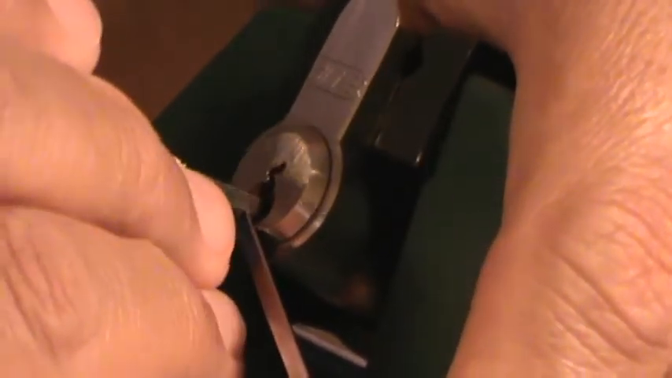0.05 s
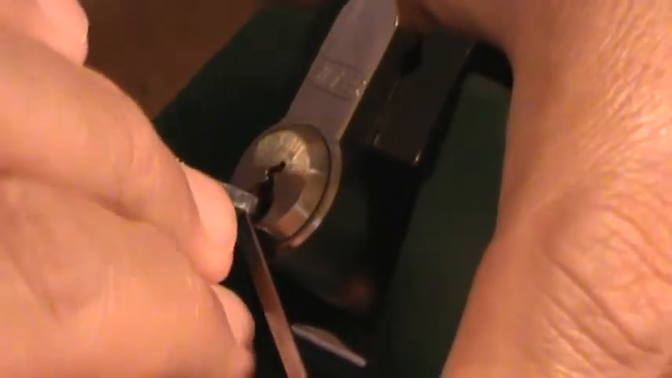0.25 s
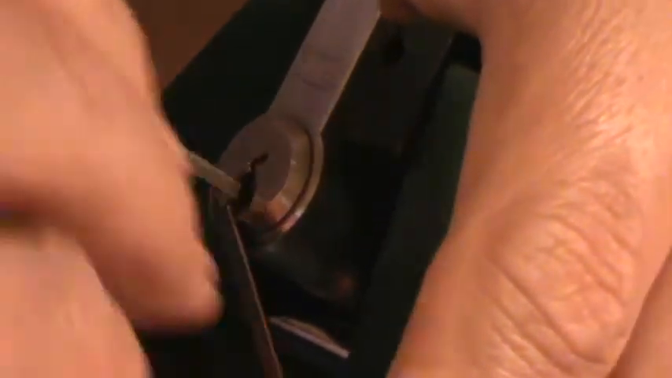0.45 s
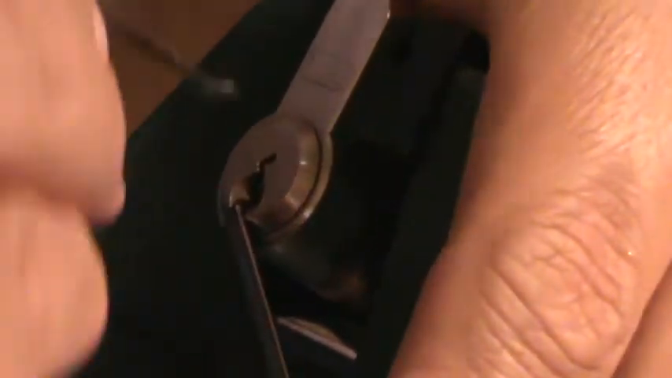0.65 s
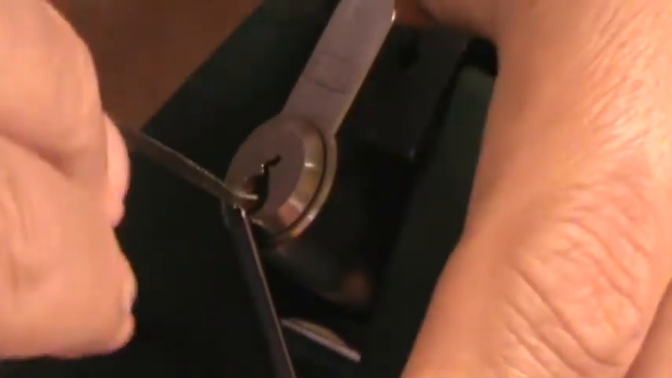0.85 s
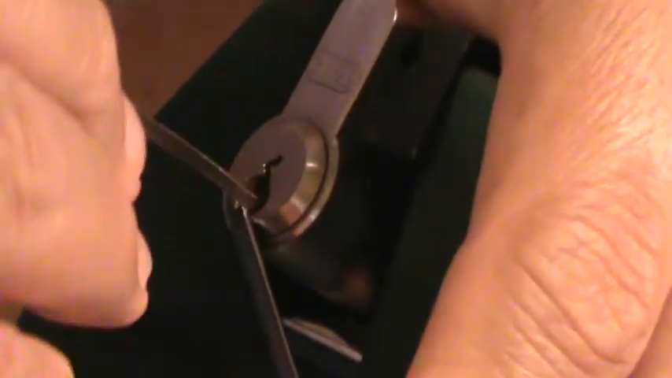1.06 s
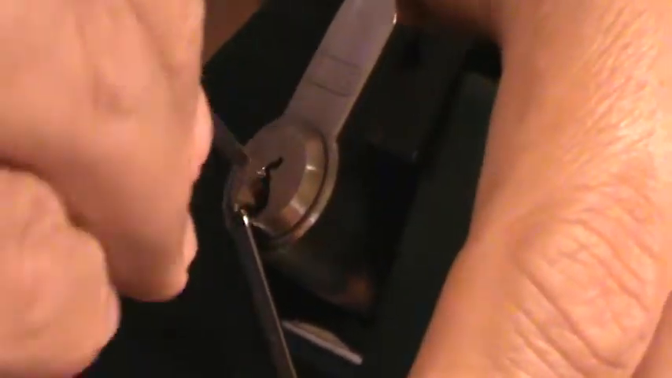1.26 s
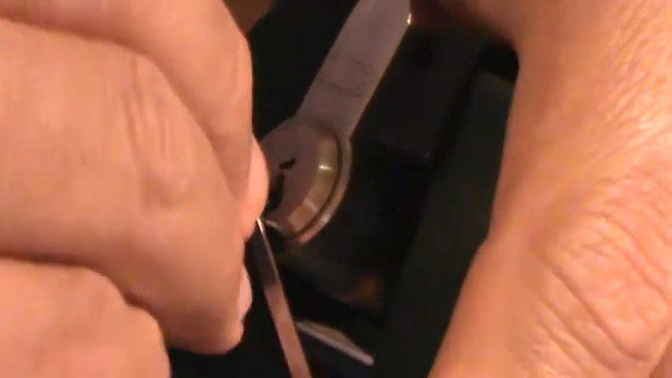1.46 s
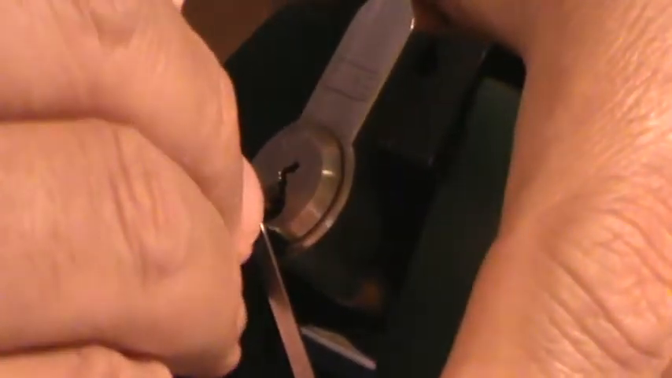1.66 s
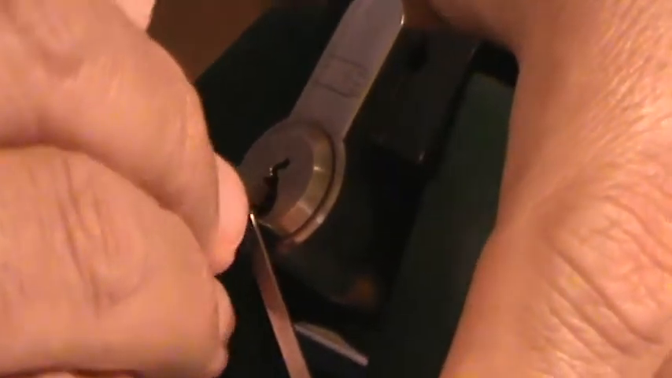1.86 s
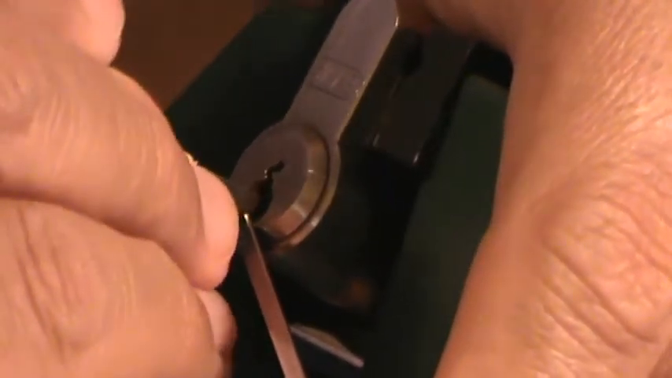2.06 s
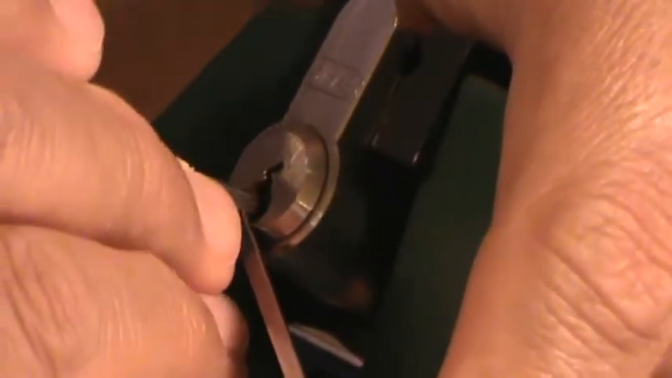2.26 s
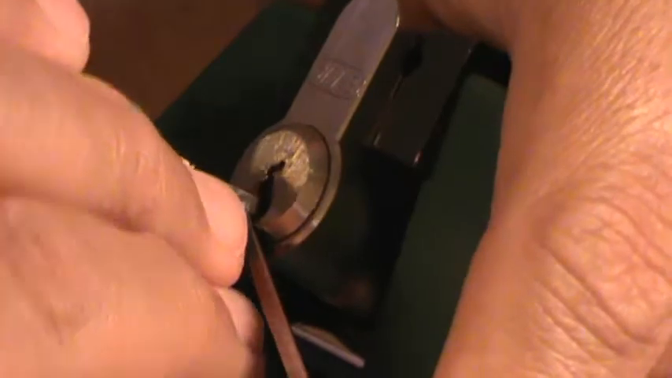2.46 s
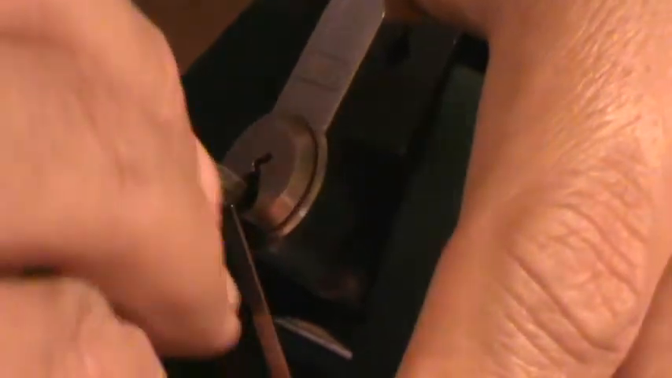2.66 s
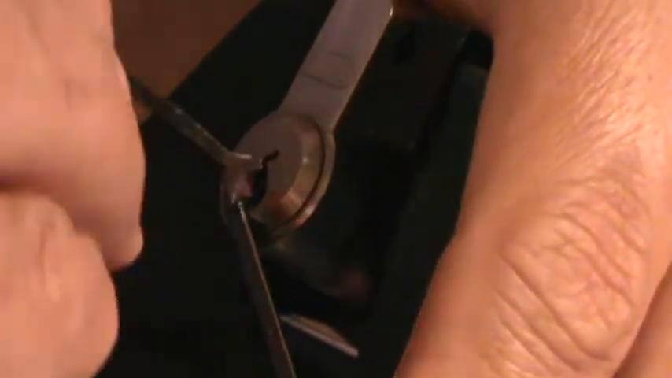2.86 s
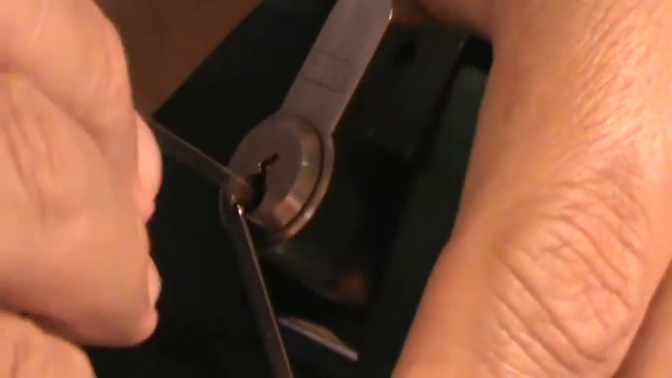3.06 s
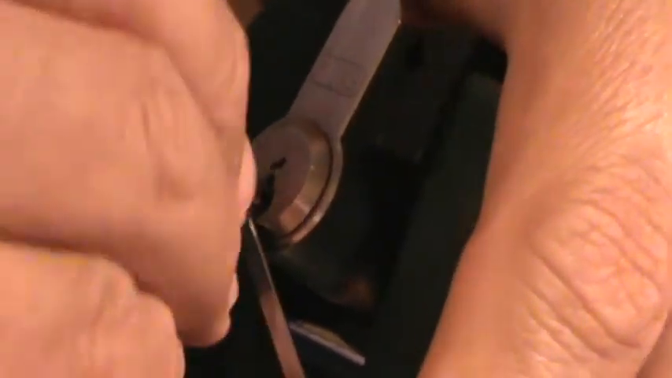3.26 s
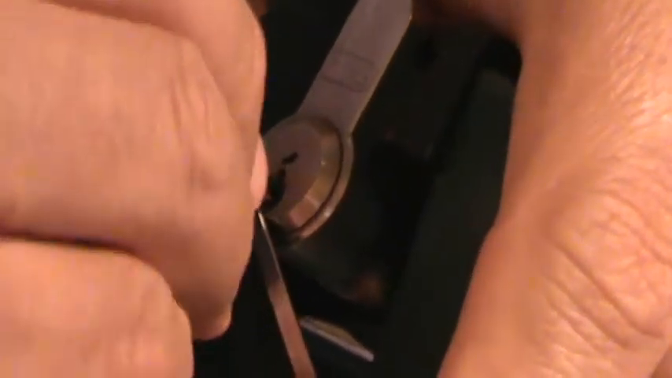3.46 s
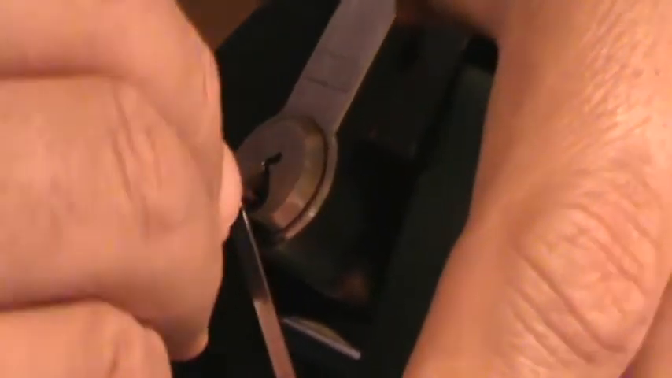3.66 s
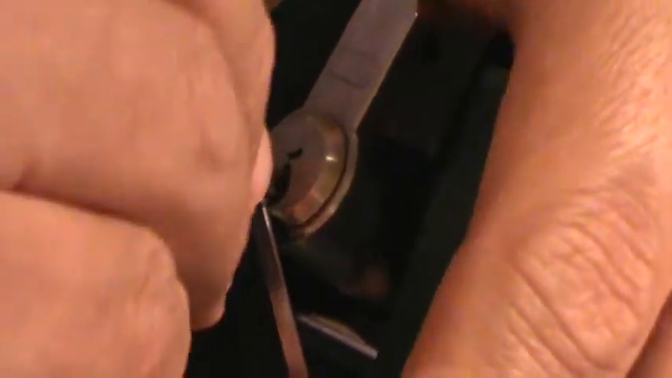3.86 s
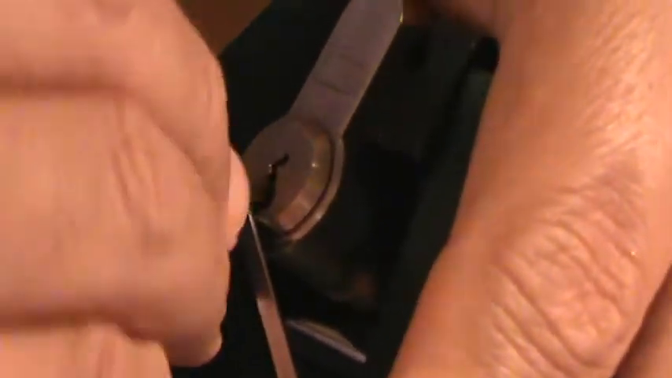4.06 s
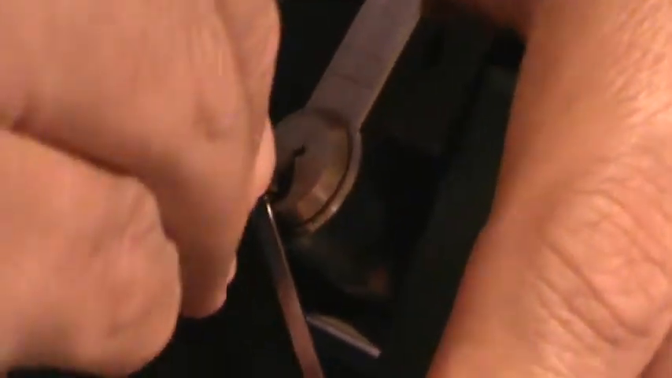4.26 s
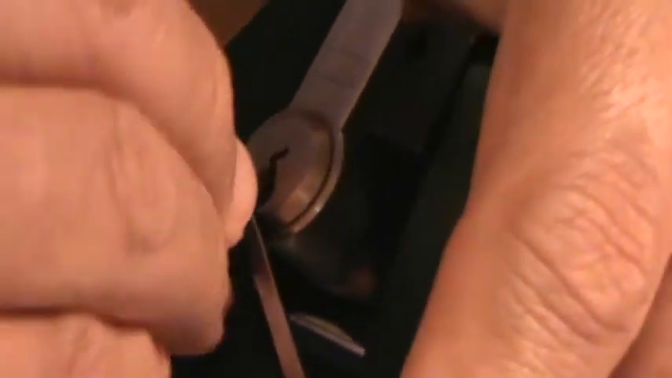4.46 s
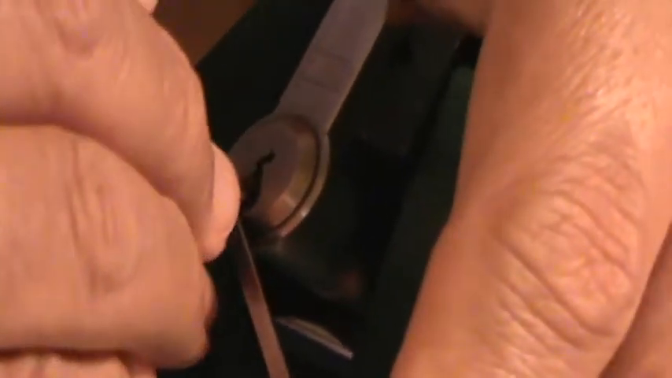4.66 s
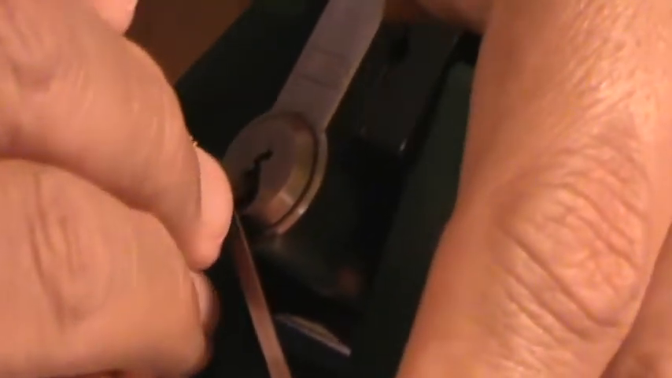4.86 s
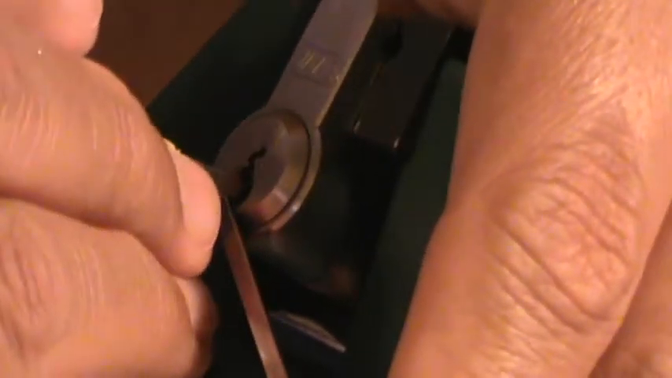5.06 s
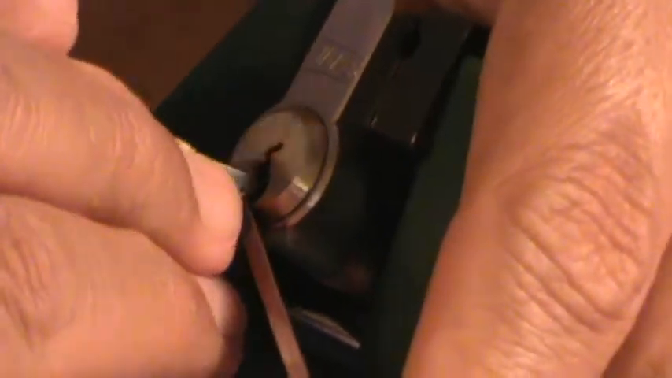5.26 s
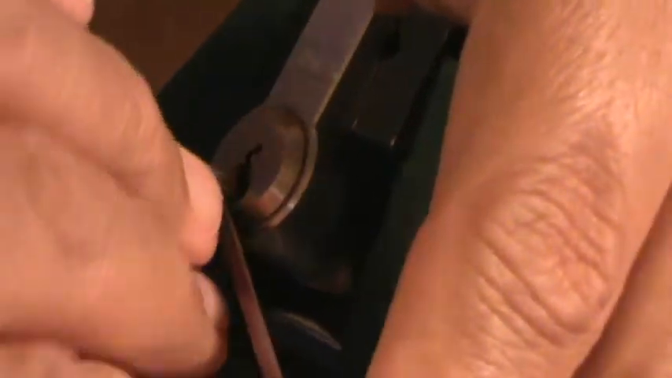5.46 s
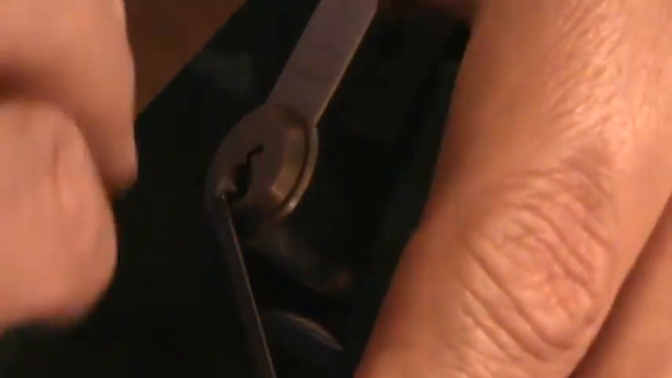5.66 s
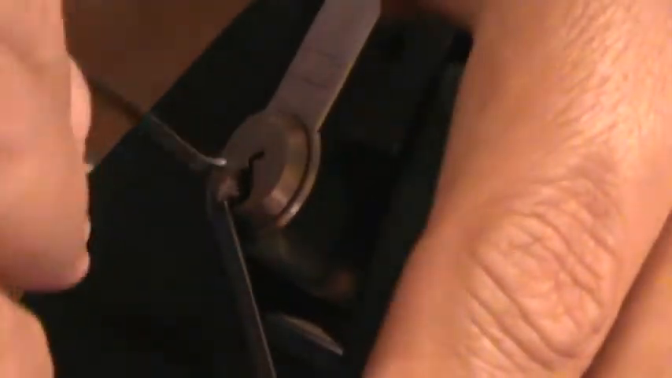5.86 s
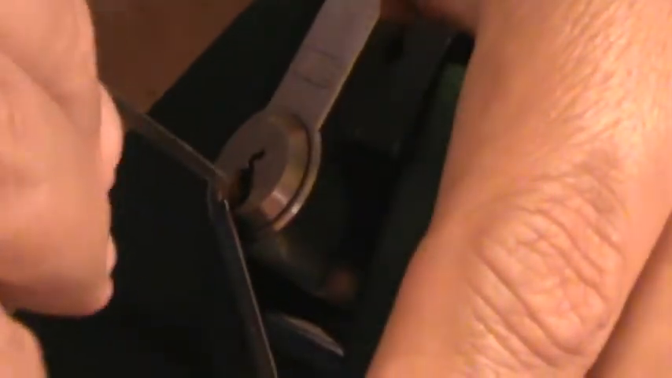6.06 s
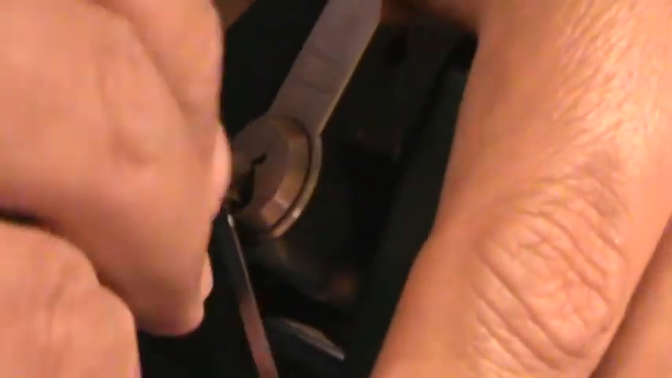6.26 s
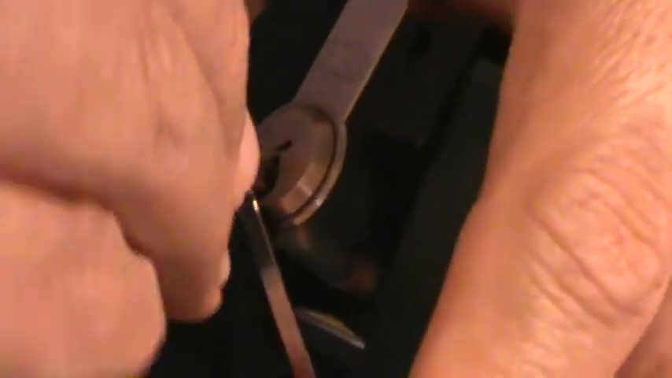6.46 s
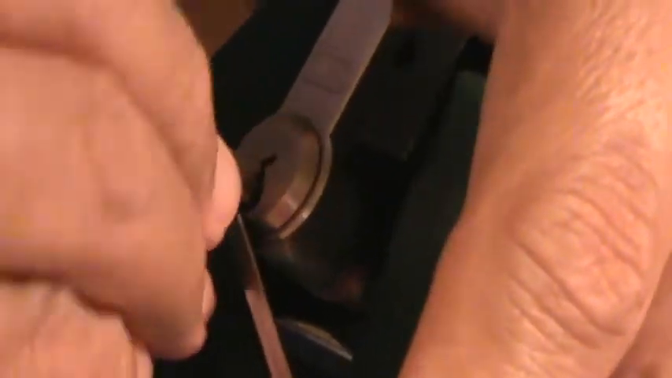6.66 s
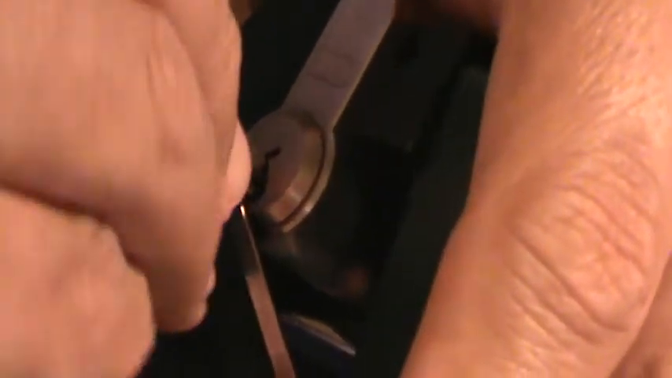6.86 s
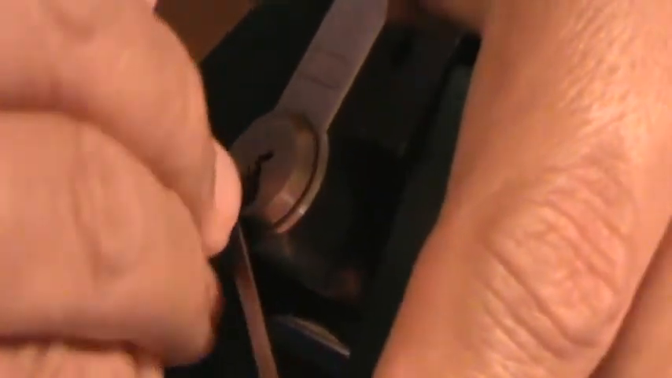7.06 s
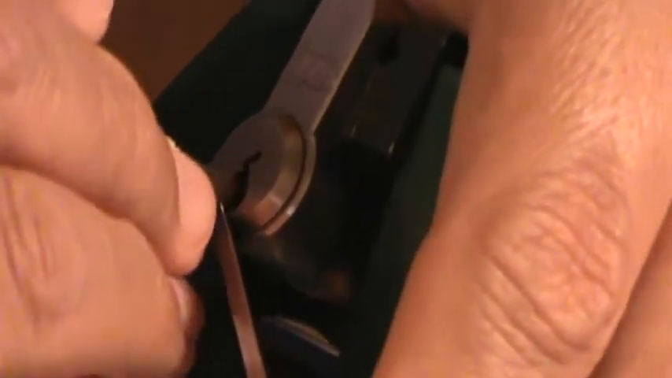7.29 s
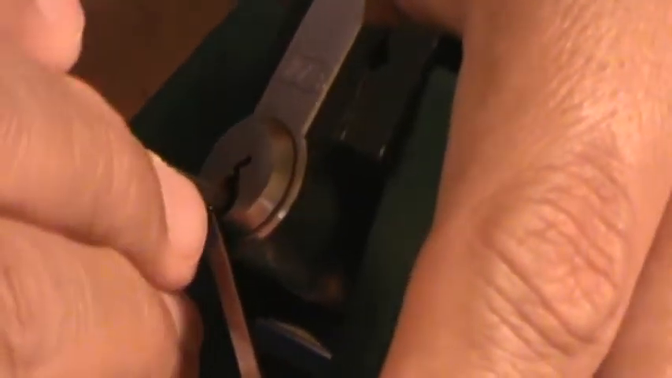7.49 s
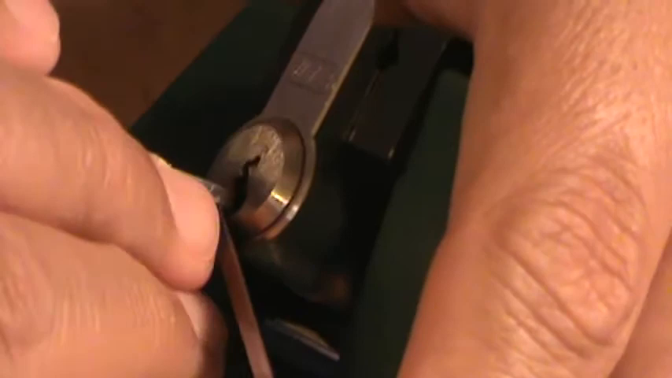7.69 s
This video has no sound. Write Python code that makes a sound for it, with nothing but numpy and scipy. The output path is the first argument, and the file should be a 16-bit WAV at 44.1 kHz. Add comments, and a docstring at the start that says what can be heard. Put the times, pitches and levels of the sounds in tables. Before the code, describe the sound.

Four sharp metallic snaps from a small cylinder lock being picked, with faint ticks and scrapes between them, close up in a quiet humming room.

```python
"""A steel pick works inside a small cylinder lock held in a vice, heard close by in a quiet room.
Pick: micro-impact noise through steel resonances, plus modal knocks of the mount; slides are runs of catches.
Four times the sprung pins snap back: harder contacts that ring lock and mount and wake the room.
Finger rubs are shaped noise; a brief squeak is three falling tones.
Behind: room noise, mains hum, a low drone that swells midway and a thin electronic whine."""
import sys
import numpy as np
from scipy import signal
from scipy.fft import rfft, irfft, next_fast_len
from scipy.io import wavfile
from scipy.ndimage import uniform_filter1d, map_coordinates

SR = 44100
rng = np.random.default_rng(int(sys.argv[2]) if len(sys.argv) > 2 else 0)


def master(y):
    """Save y as 16-bit WAV."""
    cut = np.clip(np.atleast_2d(y).T, -1, 1)
    pcm = np.round(cut * 32767)  # scale
    wavfile.write(sys.argv[1], SR, pcm.astype(np.int16))


N = 340893

# Pins snapping back: (time [s], level [dB], relative mount knock [dB], treble shelf [dB],
# contact t60 [s], favoured steel ring [Hz], favoured mount ring [Hz], room [dB])
PIN_SNAPS = [(0.0504, 6, -5, -0.5, 0.0035, 5060, 1520, -9),
             (2.258, 3, -13.5, 3.5, 0.003, 12100, 1000, -4.5), (5.224, 3.5, -3, 2, 0.0028, 4000, 1680, -7),
             (7.6348, 3, 3, -0.5, 0.014, 4360, 1090, -13)]
# Pick striking pins and keyway: (time [s], relative level [dB], relative mount knock [dB],
# treble shelf [dB], favoured ring [Hz])
PICK_TICKS = [(0.4543, -23.5, -6, 3, 12770), (0.471, -24, -1, -2, 8760), (0.4735, -21, -14, 1.5, 12270),
              (0.861, -38, -6, 2, 9800), (1.119, -29.5, -7, 7, 10380), (1.1305, -31, 0.5, 4, 6270),
              (1.333, -37.5, -2, 3, 8480), (1.4, -33, -11, 1, 10160), (2.4033, -26.5, -3, -5, 8900),
              (2.6781, -20, -9, 6.5, 11700), (2.701, -26.5, 2, 1, 6800), (2.7853, -34.5, -3, 3, 7130),
              (2.9688, -35.5, 1, 6, 10230), (3.0008, -33.5, -1, -3, 8660), (3.1216, -35.5, 0, 2, 9240),
              (3.1486, -35, 3, 7, 9630), (3.2249, -27.5, 0, 1, 4030), (3.234, -31.5, 3.5, 2, 11520),
              (3.2551, -26.5, -10, 2, 4260), (3.3557, -16.5, -9, 4.5, 5080), (5.5402, -33, -3, -4, 3900),
              (5.571, -25, 2, 1, 6400), (5.5738, -19, -3.5, 4.5, 11330), (5.632, -32.5, -16, 4, 9560),
              (5.6606, -36, -12, -3, 10360), (5.9776, -34, -4, 4, 9500), (5.998, -35, -9, 7, 5450),
              (6.128, -36, 5.5, -2, 8330), (6.14, -30, -10, 10, 9500), (6.2663, -29, 4.5, 7, 4200),
              (6.2748, -31.5, 2, 1, 11820), (6.4906, -30, 8, -1, 8800), (6.5046, -15, -9.5, 4, 8860),
              (7.6616, -26, 2, 6, 4240), (7.6917, -13, -19, 2, 8250), (7.7, -22, -20, 9, 9220),
              (7.7184, -27.5, -4, 5, 11350), (7.7272, -28, -8, 4, 11580)]
# Pick sliding in the keyway: (time [s], level [dB], length [s])
PICK_SLIDES = [(0.449, -51, 0.11), (1.09, -53.5, 0.082), (1.252, -51.5, 0.038), (1.301, -52, 0.065),
               (2.696, -55, 0.09), (3.09, -53, 0.11), (3.207, -44, 0.044), (5.551, -54, 0.135),
               (6.243, -43.5, 0.06)]
# Fingers shifting their grip: (time [s], level [dB], t60 [s])
FINGER_RUBS = [(0.590, -44, .15), (1.196, -39.5, 0.035), (3.771, -46, 0.037), (4.152, -42, 0.028)]
# Tones of the tool squeak: (time [s], level [dB], length [s], start [Hz], end [Hz])
TOOL_SQUEAKS = [(4.440, -48.5, 0.013, 3450, 3200), (4.440, -50, .017, 3050, 2650),
                (4.440, -47, 0.013, 2700, 1790)]
# Resonances of pick and pins: (centre [Hz], width [Hz], relative prominence [dB])
STEEL_RESONANCES = [(2910, 61, 4.5), (3700, 440, -1), (4230, 130, -1.5), (5650, 130, -23), (6440, 1200, -4),
                    (8610, 1500, 2), (10090, 200, -6), (11500, 150, -2), (12800, 190, -2), (13700, 87, -6),
                    (14300, 190, -8.5)]
# Modes of lock body and vice: (frequency [Hz], relative level [dB], t60 before damping [s])
MOUNT_MODES = [(726, -6, 0.068), (1055, -0.5, 0.065), (1337, -5.5, 0.054), (1407, 1.5, 0.062),
               (1650, -13, 0.036), (1806, -2, 0.059), (1936, 0, 0.064)]
# Spectrum of a pin snap: (frequency [Hz], relative density [dB per Hz])
SNAP_SPECTRUM = [(200, -46), (700, -3.5), (2000, -23), (2600, -3), (3600, -3), (4700, -2), (5800, -2),
                 (7800, -3.5), (9100, 2.5), (10000, -3), (11200, 3), (12700, 0.5), (13700, -8.5),
                 (16000, -14)]
# Spectrum of a pick tick: (frequency [Hz], relative density [dB per Hz])
TICK_SPECTRUM = [(200, -53), (800, 8.5), (2000, -6), (2500, 0.5), (3800, 1.5), (5800, 0.5), (8600, -3),
                 (12500, -1), (16000, -9.5)]
# Spectrum of the scrape: (frequency [Hz], relative density [dB per Hz])
SCRAPE_SPECTRUM = [(300, -17), (850, 13.5), (1400, -2), (1950, 11), (2600, -8), (9000, -8), (16000, -2)]
# Spectrum of the mount thud: (frequency [Hz], relative density [dB per Hz])
THUD_SPECTRUM = [(200, -36), (520, -6.5), (720, -3), (880, -12), (1040, -5), (1200, -3), (1420, 1),
                 (1600, -2.5), (1900, 5.5), (2150, 0), (4000, -45)]
# Spectrum of a finger rub: (frequency [Hz], relative density [dB per Hz])
SKIN_SPECTRUM = [(300, -22), (700, 9.5), (2000, 8), (3600, 2), (6000, -6.5), (15000, -13)]
# Reverberation of the room: (frequency [Hz], t60 [s])
ROOM_T60 = [(300, 0.2), (1600, 0.39), (5000, 0.35), (11000, 0.26), (16000, 0.24)]
# Spectrum of the room noise: (frequency [Hz], relative density [dB per Hz])
AIR_SPECTRUM = [(12, -50), (20, -18.5), (48, -8.5), (91, -10), (107, -8), (123, -5.5), (146, -12),
                (187, -8.5), (222, -12), (377, -14.5), (513, -20.5), (590, -18.5), (1530, -27.5),
                (6720, -38), (16000, -38.5)]
# Stereo likeness of the room noise: (frequency [Hz], left-right correlation [-])
AIR_CORRELATION = [(60, 1.0), (150, 1), (380, 0.9), (950, 0.59), (2380, 0.29), (5980, 0.5), (15000, 0.75)]
# Hum and electronic whine: (frequency [Hz], mean level [dB])
HUM_TONES = [(60, -60), (119.8, -49.5), (191, -59), (374, -62.5), (15734, -71)]

TICK_T60_S = 0.012  # the fingers damp every light contact alike
KNOCK_LAG_S = 0.0008  # after a tick the mount answers just behind the steel
SNAG_GAP_S, SNAG_RELATIVE_DB, SNAG_SCATTER_DB = 0.04, -40, 3.5
SNAG_KNOCK_RELATIVE_DB, SNAG_BRIGHT_DB = 4.5, 2
SNAG_RING_LOW_HZ, SNAG_RING_HIGH_HZ = 8200, 10400
DRONE_HZ, DRONE_DB, DRONE_IDLE_DB = 86.2, -44.5, -61.5  # swollen, and before and after
DRONE_START_S, DRONE_ATTACK_S, DRONE_HOLD_S, DRONE_RELEASE_S = 1.92, 0.28, 1.45, 1.74
BASS_CUT_HZ, TOP_HZ = 36, 15850


def snaps():
    """The pins shoot back on their springs, hard enough to wake the room."""
    out = np.zeros((2, N))
    colour = lambda hz: along(SNAP_SPECTRUM, hz)
    for time_s, db, knock_db, bright_db, t60_s, ring_hz, knock_hz, room_db in PIN_SNAPS:
        crack = contact(colour, bright_db, ring_hz, t60_s, ring_db=-5, ring_t60_s=0.043,
                        accent_db=6.0, wet_db=room_db, near_db=-8)
        balance = amp([[-0.7], [0.7]])
        add(out, time_s, amp(db) * crack * balance)
        knock = mount(damping=1.35, thud_db=-1, thud_t60_s=0.04, rise_s=0.002)
        knock = norm(coloured(knock, lambda hz: 6.5 * bump(hz, knock_hz, 600)))
        # the mount radiates all round: no left-right balance
        knock = in_room(knock, wet_db=room_db + 2.5, near_db=-14)
        add(out, time_s, amp(db + knock_db) * knock)
    return out


def ticks():
    """The distinct strikes of the pick, and the snags along its slides."""
    out = np.zeros((2, N))
    for time_s, *strike in PICK_TICKS + snags():
        click, knock = tick(*strike)
        add(out, time_s, click)
        add(out, time_s + KNOCK_LAG_S, knock)
    return out


def tick(db, knock_db, bright_db, ring_hz):
    """One light contact of the pick: a click of steel and a soft knock of the mount."""
    colour = lambda hz: along(TICK_SPECTRUM, hz) + steel_db(hz)
    click = contact(colour, bright_db, ring_hz, TICK_T60_S, ring_db=-10, ring_t60_s=0.047,
                    accent_db=8, wet_db=-15.5, near_db=-7.0)
    balance = amp([[-0.8], [0.8]])
    knock = mount(damping=1.3, thud_db=3, thud_t60_s=0.078, rise_s=0.00019)
    # a soft blow favours a low mode
    soft_blow = [(600, 3.5), (1030, 4.5), (1400, -7.5), (2000, -1.5)]
    knock = coloured(knock, lambda hz: along(soft_blow, hz))
    return amp(db + 11.5) * click * balance, amp(db + knock_db + 9.5) * in_room(knock, wet_db=-14.5)


def snags():
    """Rows of faint ticks, spread unevenly along each slide."""
    rows = []
    for start_s, _, length_s in PICK_SLIDES:
        count = max(1, round(length_s / SNAG_GAP_S))
        for k in range(count):
            time_s = start_s + length_s * (k + rng.uniform(0.2, 0.8)) / count
            db = rng.normal(SNAG_RELATIVE_DB, SNAG_SCATTER_DB)
            ring_hz = rng.uniform(SNAG_RING_LOW_HZ, SNAG_RING_HIGH_HZ)
            rows.append((time_s, db, SNAG_KNOCK_RELATIVE_DB, SNAG_BRIGHT_DB, ring_hz))
    return rows


def slides():
    """The blade drags along the keyway in a run of tiny catches over fine friction noise."""
    out = np.zeros((2, N))
    for time_s, db, length_s in PICK_SLIDES:
        n = int(length_s * SR)
        friction = 0.075 * rng.standard_normal(n)
        catches = (rng.random(n) < 900 / SR) * rng.uniform(-1.2, 1, n)  # about 900 a second
        scrape = coloured(friction + catches, lambda hz: along(SCRAPE_SPECTRUM, hz) + steel_db(hz))
        add(out, time_s, in_room(amp(db) * unit(scrape) * np.hanning(n), wet_db=-9))
    return out


def contact(colour, bright_db, ring_hz, t60_s, ring_db, ring_t60_s, accent_db, wet_db, near_db):
    """Steel on steel, in stereo: micro-impacts and a short after-ring, one resonance standing out."""
    t = np.arange(SR // 4) / SR
    blow, after_ring = rng.standard_normal((2, len(t)))
    impacts = norm(blow * fade(t, t60_s) * (1 - np.exp(-t / 0.00025)))
    burst = impacts + amp(ring_db) * norm(after_ring * fade(t, ring_t60_s))
    # a hard impact feeds all frequencies evenly: level the burst before the steel colours it
    spectrum = rfft(burst)
    power = np.abs(uniform_filter1d(np.abs(spectrum) ** 2, size=300))
    burst = norm(irfft(spectrum / np.sqrt(power + 1e-9))[:len(t) // 2])
    shelf = [(6500, 0.0044), (10000, bright_db)]
    response_db = lambda hz: colour(hz) + along(shelf, hz) + accent_db * bump(hz, ring_hz, 780)
    steel = coloured(signal.unit_impulse(SR // 20), response_db)
    # the tail bypasses the burst and takes only the steel's colour
    heard = close_by(burst, near_db) + amp(wet_db) * room_tail()
    return signal.fftconvolve(heard, norm(steel)[None], axes=1)


def steel_db(hz):
    """Resonances of pick and pins, weighted anew by each point of contact."""
    return sum((7.0 + db / 2 + rng.normal(0, 1.85)) * bump(hz, centre_hz, width_hz)
               for centre_hz, width_hz, db in STEEL_RESONANCES)


def mount(damping, thud_db, thud_t60_s, rise_s):
    """Lock and vice take up the blow gradually: decaying modes and a dull thud, energy one."""
    t = np.arange(SR // 4) / SR
    ring = 0
    for hz, db, t60_s in MOUNT_MODES:
        level = amp(db + rng.normal(0, 2.3))
        ring = ring + level * fade(t * damping, t60_s) * np.sin(2 * np.pi * (hz * t + rng.random()))
    thud = rng.standard_normal(len(t)) * fade(t, thud_t60_s)
    thud = coloured(thud, lambda hz: along(THUD_SPECTRUM, hz))
    onset = 1 - np.exp(-(t / rise_s) ** 2)
    return norm((norm(ring) + amp(thud_db) * norm(thud)) * onset)


def handling():
    """Fingers rub softly as shaped noise; a stick-slip squeak falls in pitch."""
    out, t = np.zeros((2, N)), np.arange(SR // 4) / SR
    for time_s, db, t60_s in FINGER_RUBS:
        rub = unit(coloured(rng.standard_normal(len(t)), lambda hz: along(SKIN_SPECTRUM, hz)))
        envelope = fade(t, t60_s) * (1 - np.exp(-t / 0.00079))
        add(out, time_s, in_room(amp(db) * rub * envelope, wet_db=-5.5))
    for time_s, db, length_s, start_hz, end_hz in TOOL_SQUEAKS:
        n = int(length_s * SR)
        pitch_hz = np.linspace(start_hz, end_hz, n) * (1 + 0.033 * wobble(480)[:n])  # unsteady slip
        squeak = np.sin(2 * np.pi * np.cumsum(pitch_hz) / SR) * signal.windows.tukey(n)
        add(out, time_s, in_room(amp(db) * squeak, wet_db=-10))
    return out


def drone():
    """A low sine of wandering phase swells quickly, holds and slowly sinks back."""
    t = np.arange(N) / SR
    corners_s = np.cumsum([DRONE_START_S, DRONE_ATTACK_S, DRONE_HOLD_S, DRONE_RELEASE_S])
    level_db = np.interp(t, corners_s, [DRONE_IDLE_DB, DRONE_DB, DRONE_DB, DRONE_IDLE_DB])
    return amp(level_db) * unit(np.sin(2 * np.pi * DRONE_HZ * t + 0.69 * wobble(2.76)))


def background():
    """Room noise of frequency-dependent stereo width, with slightly unsteady hum and whine."""
    t = np.arange(N) / SR
    # the mid-side angle sets the left-right correlation
    angle = lambda hz: np.arccos(np.clip(along(AIR_CORRELATION, hz), -1, 1)) / 2
    response = lambda hz: amp(along(AIR_SPECTRUM, hz)) * np.array([np.cos(angle(hz)), np.sin(angle(hz))])
    mid, side = filtered(rng.standard_normal((2, N)), response)
    air = amp(-46.5) * unit(np.array([mid + side, mid - side]))
    hum = sum(amp(db + 0.9 * wobble(4)) * unit(np.sin(2 * np.pi * hz * t + 0.3 * wobble(3)))
              for hz, db in HUM_TONES)
    return air + hum


def in_room(x, wet_db, near_db=-11):
    """A short sound heard close by, with the room's answer."""
    reverb = signal.fftconvolve(x[None], room_tail(), axes=1)[:, :SR // 2]
    return close_by(x, near_db) + amp(wet_db) * reverb


def close_by(x, near_db, near_t60_s=0.027):
    """Half a second of stereo: the direct sound and quick echoes off hands and bench."""
    t = np.arange(SR // 2) / SR
    echoes = rng.standard_normal((2, len(t))) * fade(t, near_t60_s) * (1 - np.exp(-t / 0.0013))
    answer = signal.unit_impulse(len(t)) + np.sqrt(2) * amp(near_db) * norm(echoes)
    return signal.fftconvolve(x[None], answer, axes=1)[:, :len(t)]


def room_tail():
    """Half a second of stereo reverberation, energy one a side; each frequency dies at its own speed."""
    hz, t, z = signal.stft(rng.standard_normal((3, SR // 2)), SR, nperseg=256)
    decayed = z * fade(t, along(ROOM_T60, hz)[:, None])
    tails = signal.istft(decayed, SR, nperseg=256)[1][:, :SR // 2]
    t = np.arange(SR // 2) / SR
    shared = 1.26 * tails[2]  # correlates left and right
    return np.sqrt(2) * norm((tails[:2] + shared) * (1 - np.exp(-t / 0.0044)))


def amp(db):
    """Decibels to amplitude."""
    return 10 ** (np.asarray(db) / 20)


def unit(x):
    """Scaled to an RMS of one."""
    return x / np.sqrt(np.mean(x ** 2) + 1e-20)


def norm(x):
    """Scaled to an energy of one."""
    return x / np.sqrt(np.sum(x ** 2) + 1e-20)


def along(points, hz):
    """Interpolate (Hz, value) points on a log frequency axis."""
    point_hz, values = np.transpose(points)
    return np.interp(np.log(hz + 1), np.log(point_hz + 1), values)


def bump(hz, centre_hz, width_hz):
    """A resonance's share: one at its centre, width_hz wide at half height."""
    return 1 / (1 + (2 * (hz - centre_hz) / width_hz) ** 2)


def fade(t, t60_s):
    """Exponential decay by 60 dB in t60_s."""
    return np.exp(-np.log(1000) * t / np.maximum(t60_s, 1e-4))


def wobble(rate_hz):
    """A smooth random curve, rate_hz knots a second."""
    knots = rng.standard_normal(int(N * rate_hz / SR) + 4)
    return map_coordinates(knots, [np.arange(N) * rate_hz / SR])


def filtered(x, response):
    """x times a response of frequency."""
    n = x.shape[-1]
    m = next_fast_len(n + SR // 2)
    return irfft(rfft(x, m) * response(np.fft.rfftfreq(m, 1 / SR)), m)[..., :n]


def coloured(x, level_db, size=2048):
    """x through the causal minimum-phase filter whose dB gain is level_db(Hz)."""
    cepstrum = irfft(np.log(amp(level_db(np.fft.rfftfreq(size, 1 / SR)))))
    # fold onto positive time: minimum phase
    cepstrum[1:size // 2] *= 2
    cepstrum[size // 2 + 1:] = 0
    impulse_response = irfft(np.exp(rfft(cepstrum)))
    return signal.fftconvolve(x, impulse_response)[:len(x)]


def add(track, time_s, x):
    """Mix x into the track at time_s."""
    start = int(np.clip(round(time_s * SR), 0, N - 1))
    track[..., start:start + x.shape[-1]] += x[..., :N - start]


def scene():
    """The lock and the hands in front of the room's steady sounds."""
    return background() + drone() + snaps() + slides() + handling() + ticks()


def record(dry):
    """Roll off the deepest bass, then cut steeply above TOP_HZ."""
    bass_cut = filtered(dry, lambda hz: hz ** 2 / np.sqrt(hz ** 4 + BASS_CUT_HZ ** 4))
    return filtered(bass_cut, lambda hz: 1 / (1 + (hz / TOP_HZ) ** 200))


dry = scene()
out = record(dry)
master(out)
```